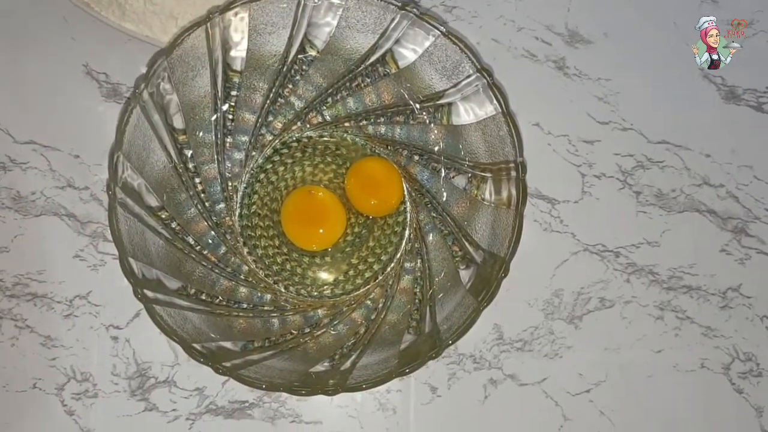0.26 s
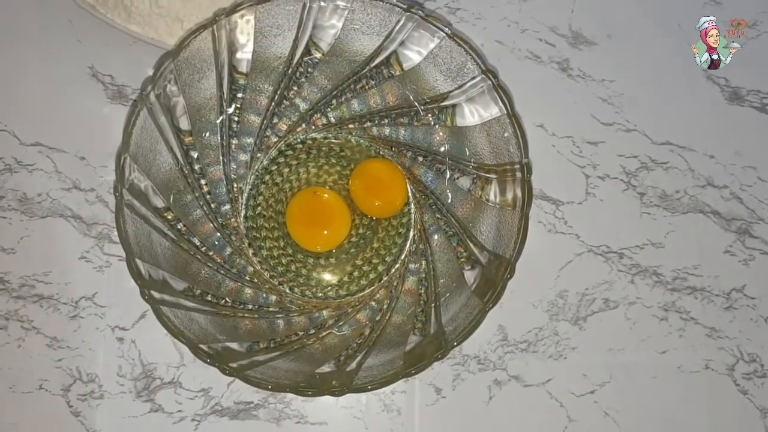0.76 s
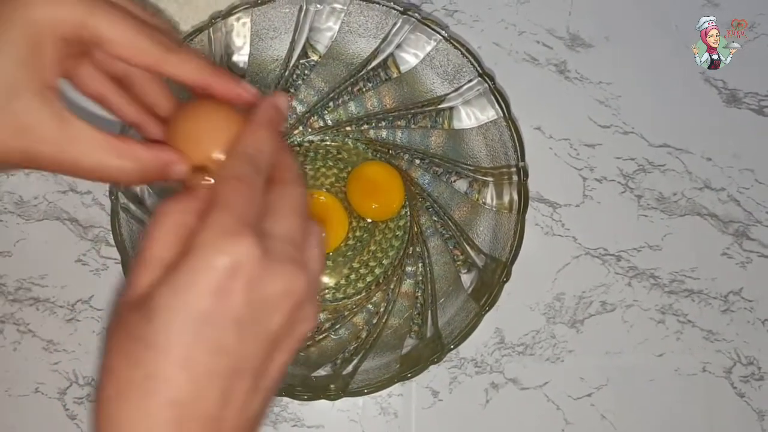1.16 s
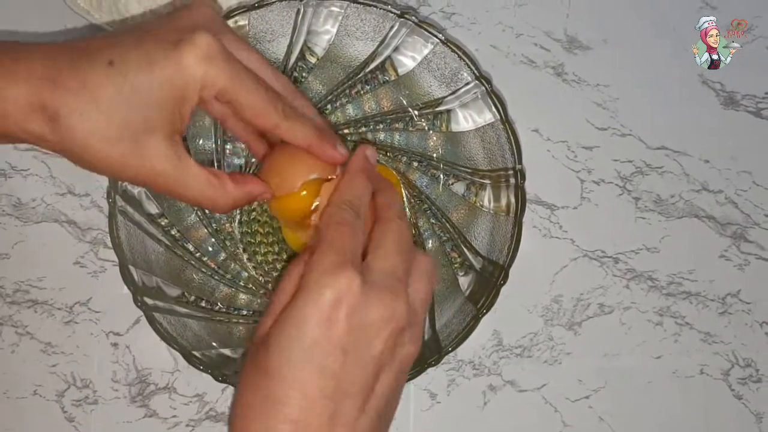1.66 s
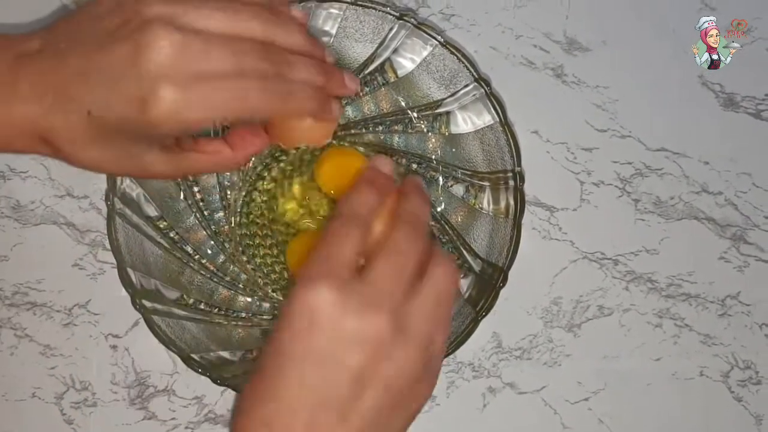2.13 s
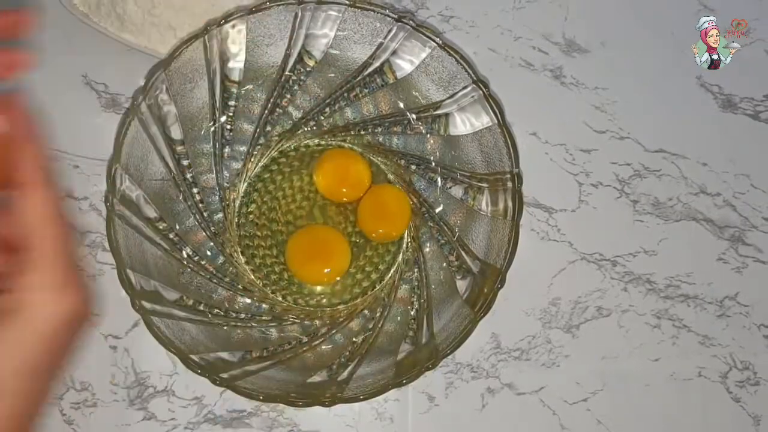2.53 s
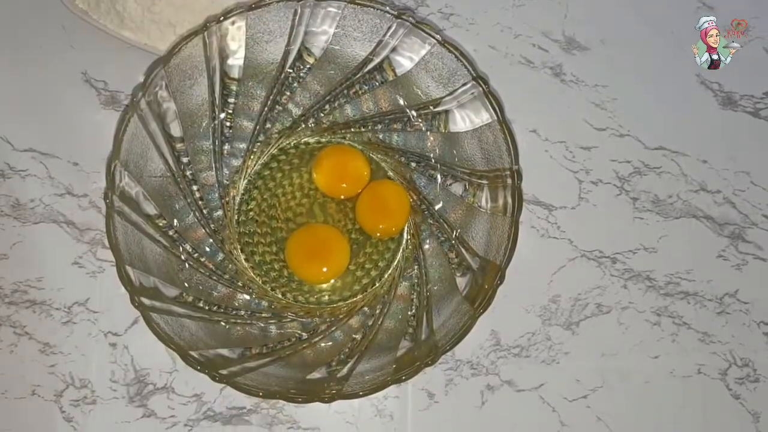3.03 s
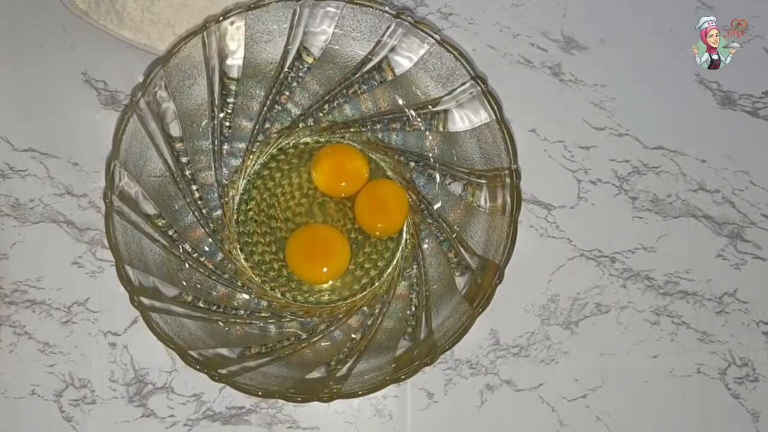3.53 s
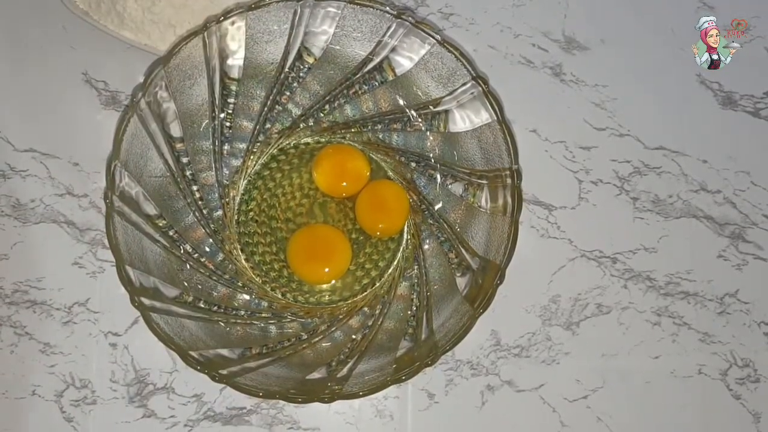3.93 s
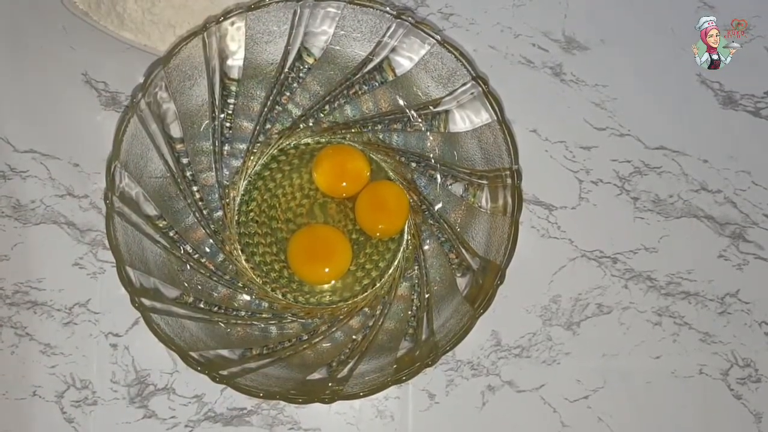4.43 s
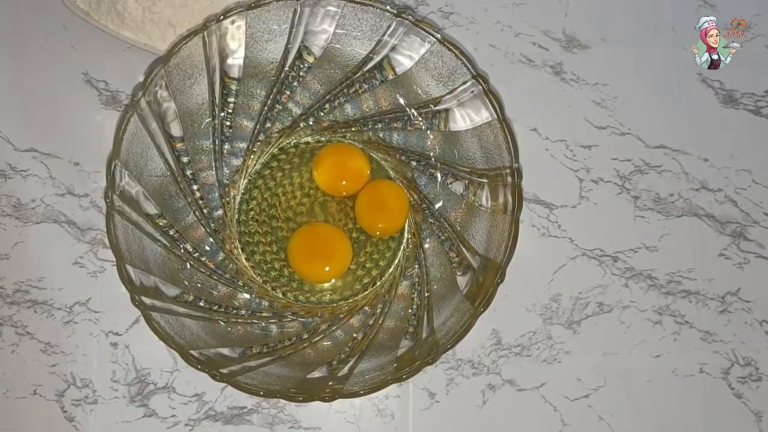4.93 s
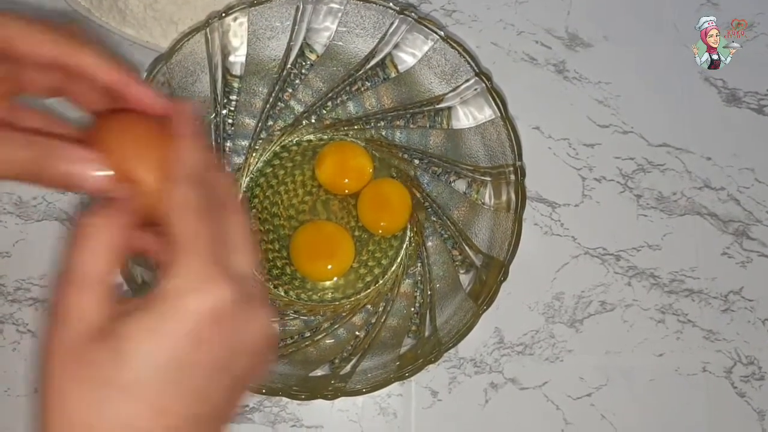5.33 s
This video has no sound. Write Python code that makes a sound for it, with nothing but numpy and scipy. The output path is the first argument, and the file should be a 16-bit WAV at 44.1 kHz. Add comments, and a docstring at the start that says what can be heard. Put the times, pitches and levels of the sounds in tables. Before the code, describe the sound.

Close stereo microphones hear a rapid cluster of hollow egg cracks, sparse peeling crackles and sharp shell ticks, then dense crunching as the halves are nested. Next come dry tray rubbing, faint rising creaks, soft low bumps and three spaced taps on the counter. Short bright kitchen reflections follow every sound; afterwards only quiet air and a faint hand rustle remain.

```python
"""An egg is knocked and crushed on a counter edge, pulled open over a glass bowl, its halves nested.
A second egg is scraped out of its creaking, crinkling tray and tapped three times on the counter.
Shell breaks in bursts of tiny clicks; short resonances are the air in the hollow egg and its halves.
Filtered grains make the rubbing, pulses make low room booms, and noise makes the rustle and the quiet.
A small hard kitchen answers every shell and tray sound."""
import sys
import numpy as np
from scipy import signal
from scipy.fft import rfft, irfft
from scipy.io import wavfile
from scipy.ndimage import uniform_filter1d

SR = 44100
rng = np.random.default_rng(int(sys.argv[2]) if len(sys.argv) > 2 else 0)


def dump_mix(stems):
    """Bounce the given channels to the path in sys.argv[1] as a 16-bit WAV at rate SR."""
    frames = np.atleast_2d(stems).T  # one column per channel
    limited = np.clip(frames, -1, 1)  # hard clip at full scale
    pcm = np.round(limited * 32767).astype(np.int16)
    wavfile.write(sys.argv[1], SR, pcm)


N = 246078
TIME = np.arange(N) / SR  # s

# All table levels are relative; each layer gets its trim in the mix.

# Blows of a whole egg: t/s, thud level/dB, ring f/Hz, ring level/dB, shell crack level/dB
KNOCKS = [(0.39, -61, 1880, -39, -34.5), (.402, -45.5, 1850, -10.5, -21),
          (0.508, -28.5, 1260, -12.5, -17.5), (0.529, -31, 1690, -24, -27.5),
          (.566, -16.5, 1410, -20.5, -27.5), (0.7536, -43.5, 2560, -35.5, -43.5),
          (3.2134, -27, 1055, -22, -33.5), (4.041, -63, 1940, -31, -35), (4.146, -30.5, 2210, -33, -35),
          (4.24, -48.5, 2460, -32.5, -34), (4.3024, -11, 1150, -11, -13.5),
          (4.4688, -14.5, 1180, -31, -18.5), (4.6099, -21.5, 1845, -21, -17)]
# Colour of the thud: f/Hz, level/dB
THUD_COLOUR = [(40, -20), (120, -10), (210, 0), (420, -4.5), (650, -0.5), (1000, -2.5), (1500, 2.5),
               (2400, 6), (3400, -4.5), (4400, -8.5), (9000, -34.5)]
# Colour of the cracking shell: f/Hz, level/dB
CRACK_COLOUR = [(800, -10.5), (2500, -5.5), (4200, -4.5), (6000, 0.5), (8500, -6), (12000, -6.5),
                (15500, -8.5)]


def knocks(kitchen):
    """The egg meets something hard: a thud, a short hollow ring and the shell giving way."""
    out = np.zeros((2, N))
    for s, thud_db, hz, ring_db, crack_db in KNOCKS:
        thud = flurry(push(length_s=0.00064, crumble=4.2), THUD_COLOUR)
        tone = hollow(hz, width_share=0.17)
        crack = flurry(fracture(length_s=0.0016), CRACK_COLOUR)
        front, all_round = radiate(undb(thud_db) * thud, undb(ring_db) * tone, undb(crack_db) * crack)
        add(out, s, place(front, kitchen, room_db=-2.0, all_round=all_round, near_db=-1.5))
    return out


# Short ringing after each thud: f/Hz, t60/s, level/dB
THUD_RINGING = [(1110, .2, -11), (1168, 0.31, -16.5), (1240, .22, -11), (1223, .27, -10)]


def thud_ringing(kitchen):
    """Each thud starts a few decaying sines near 1.2 kHz."""
    thuds = np.zeros(N)
    for s, thud_db, *_ in KNOCKS:
        thuds[int(s * SR)] = undb(thud_db)
    t = TIME[:SR // 2]
    sines = 0
    for hz, t60, db in THUD_RINGING:
        decay = np.exp(-np.log(1000) * t / t60)
        sines = sines + undb(db) * unit(np.sin(2 * np.pi * hz * t) * decay)
    ringing = signal.oaconvolve(thuds, sines)[:N]
    return place(ringing, kitchen, room_db=-6.5, near_db=-6.5)


# Clearest snaps of handled shell: t/s, snap level/dB, cavity f/Hz, cavity level/dB
SNAPS = [(.683, -36, 2000, -38), (1.0565, -31, 880, -44), (1.144, -31.5, 877, -63),
         (1.3025, -37.5, 790, -52), (1.4391, -30, 2470, -63.5), (1.4843, -6.5, 3580, -43.5),
         (1.498, -11.5, 1330, -34.5), (1.5096, -7, 3370, -17.5), (1.597, -26.5, 2300, -34),
         (1.6736, -30, 2640, -45.5), (1.722, -11, 3400, -23.5), (1.731, -41, 2320, -32),
         (1.785, -33, 3120, -33), (1.814, -31, 2200, -59), (1.8398, -37, 720, -56),
         (1.9165, -33, 3540, -38.5), (2.023, -28.5, 710, -56), (2.1166, -29, 2130, -38),
         (2.137, -37.5, 2060, -61), (2.3029, -34.5, 2080, -64), (2.3613, -10.5, 2025, -20.5),
         (2.428, -16, 1740, -21), (2.443, -12, 2050, -50), (2.4615, -16, 1990, -46),
         (2.6194, -26.5, 1870, -47), (2.632, -23, 1800, -32.5), (2.7041, -20.5, 1590, -14),
         (2.7315, -18.5, 1690, -16), (2.7514, -15.5, 1690, -15.5), (2.76, -30, 1580, -25.5),
         (3.3667, -29, 1670, -19.5), (3.421, -40, 1750, -15.5), (3.66, -24, 1820, -34),
         (3.871, -32, 1750, -33.5), (3.9489, -30.5, 2420, -36), (5.423, -58.5, 1800, -49),
         (5.518, -41.5, 1730, -60)]
# Colour of a snap: f/Hz, level/dB
SNAP_COLOUR = [(100, -30), (600, -21.5), (1000, -26), (2200, -28.5), (3400, -17), (4500, 0), (6200, 4),
               (8000, 2.5), (10500, 5), (13000, 0), (15500, -4)]


def snaps(kitchen):
    """Bright snaps of shell ring the air in the open half."""
    out = np.zeros((2, N))
    for s, snap_db, hz, cavity_db in SNAPS:
        snap = flurry(fracture(length_s=0.00024), SNAP_COLOUR)
        cavity = hollow(hz, width_share=0.17)
        front, all_round = radiate(undb(snap_db) * snap, undb(cavity_db) * cavity)
        add(out, s, place(front, kitchen, room_db=-3.5, all_round=all_round, near_db=7.0))
    return out


# Presses into the counter edge: t/s, hold/s, body level/dB, grit level/dB
CRUSH = [(.378, 0.079, -44.5, -39.5), (.482, .017, -37, -39), (.505, 0.03, -19.5, -30),
         (.549, 0.014, -21, -25.5)]
# Colour of the crush: f/Hz, level/dB
CRUSH_COLOUR = [(100, -44.5), (200, -18.5), (450, -11.5), (800, 0), (1300, 2.5), (1750, 8.5), (2400, -7.5),
                (3200, -9), (4200, -21), (5800, -17.5), (11000, -25), (15500, -36.5)]
CRUSH_SHAPE = (0.0088, .02)  # attack/s, release/s


def crush(kitchen):
    """The egg is pressed into the counter edge and its shell breaks in a stream of grains."""
    grains = crunch(CRUSH, CRUSH_SHAPE, CRUSH_COLOUR, rate=2500, spread_db=3.0, patchy_db=3.0)
    return place(grains, kitchen, room_db=-2.0)


# Thumbs pulling the shell apart: t/s, hold/s, body level/dB, grit level/dB
PEEL = [(1.016, 0.092, -52.5, -47.5), (1.44, .02, -71, -45), (1.476, 0.018, -40, -25.5),
        (1.58, 0.029, -66, -37), (1.668, 0.023, -77, -35), (1.72, 0.15, -59, -51),
        (1.872, 0.028, -55, -44.5), (2.018, 0.011, -54, -42), (2.084, .035, -63, -51.5),
        (2.18, 0.027, -60, -61.5), (5.41, 0.16, -66, -67)]
# Colour of the peel: f/Hz, level/dB
PEEL_COLOUR = [(250, -29), (480, -27.5), (780, 4.5), (1100, -22), (1600, 1.5), (2250, 1), (2700, -2),
               (3400, 1), (4600, -3.5), (10400, -3.5), (15500, -11.5)]
PEEL_SHAPE = (0.0086, 0.038)  # attack/s, release/s


def peel(kitchen):
    """Thumbs work at the shell: a sparser stream of grains, uneven in colour."""
    grains = crunch(PEEL, PEEL_SHAPE, PEEL_COLOUR, rate=1300, spread_db=4.5, patchy_db=6.5)
    return place(grains, kitchen, room_db=-0.5)


# One half shell pushed into the other: t/s, hold/s, body level/dB, grit level/dB
NEST = [(2.36, 0.0088, -33, -47), (2.38, .025, -30.5, -25), (2.408, 0.025, -24, -21.5),
        (2.465, 0.061, -44, -40.5), (2.63, .06, -46.5, -41), (2.695, 0.051, -30, -26)]
# Colour of the nesting: f/Hz, level/dB
NEST_COLOUR = [(180, -62.5), (300, -20.5), (492, -20), (590, -11), (696, -9), (877, -5), (1160, -12),
               (1330, 3.5), (1440, -6), (1810, 5), (3400, -13.5), (3750, -6.5), (5660, -9), (10600, -13.5),
               (15500, -14.5)]
NEST_SHAPE = (0.0081, 0.061)  # attack/s, release/s


def nest(kitchen):
    """Shell slides and breaks against shell: a dense stream of grains of very mixed size."""
    grains = crunch(NEST, NEST_SHAPE, NEST_COLOUR, rate=3300, spread_db=5.5, patchy_db=5.0)
    return place(grains, kitchen, room_db=-5)


# Resonances of the tray: f/Hz, width/Hz, level/dB
TRAY = [(830, 57, -15.5), (1360, 350, -7.5), (1830, 890, -3.5), (2500, 180, 3), (4630, 1100, -2.5)]
# The egg rubbing on its tray: t/s, hold/s, body level/dB, grit level/dB
SCRAPE = [(3.02, 0.14, -73.5, -60.5), (3.205, 0.026, -31.5, -39.5), (3.24, 0.16, -41, -32),
          (3.355, 0.044, -29, -26.5), (3.41, 0.064, -33.5, -46), (3.495, 0.042, -34, -36),
          (3.595, .015, -39, -38.5), (3.65, 0.03, -41, -40), (3.73, 0.17, -64, -50),
          (3.835, 0.026, -44, -41.5), (3.9, 0.049, -49, -51), (4.025, 0.005, -41.5, -49),
          (4.138, 0.0052, -34.5, -42.5), (4.18, 0.11, -54.5, -56)]
SCRAPE_SHAPE = (0.012, 0.075)  # attack/s, release/s


def crinkles():
    """The flexing tray pops in each of its resonances, louder the harder it is rubbed."""
    pops = 0
    for hz, width, db in TRAY:
        pop = ring_twice(clicks(rate=45, spread_db=3, size=N), hz, width)
        pops = pops + undb(db) * steady(pop)
    body_gain = gains(SCRAPE, SCRAPE_SHAPE)[0]
    return body_gain * steady(pops)


# Colour of the rubbing: f/Hz, level/dB
SCRAPE_COLOUR = [(150, -35), (400, -25), (700, -12), (1200, -10), (1800, -2), (2700, -6), (4100, -12),
                 (5000, -6), (8000, -6.5), (11400, -6.5), (15500, -15.5)]


def scrape(kitchen):
    """The egg rubs on its tray in a dense stream of slips, with the tray crinkling along."""
    rubbing = crunch(SCRAPE, SCRAPE_SHAPE, SCRAPE_COLOUR, rate=3500, spread_db=3.0, patchy_db=2.5)
    return place(rubbing + undb(-2) * crinkles(), kitchen, room_db=-3.0)


# Creaks as the egg is pulled free: t/s, hold/s, level/dB
CREAK = [(3.55, 0.012, -53), (3.72, .015, -50.5), (3.83, 0.012, -51.5), (3.91, 0.014, -61)]
CREAK_SHAPE = (0.035, 0.022)  # attack/s, release/s


def creak(kitchen, start_hz=393, rise_hz_per_s=230):
    """One rough, broken friction tone whose mean pitch rises as the pull tightens."""
    first_s = CREAK[0][0]
    hz = start_hz + rise_hz_per_s * np.maximum(TIME - first_s, 0)
    pitch = hz * (1 + 0.09 * wander(200))
    grip = undb(4 * wander(70) - 3)
    tone = np.sin(2 * np.pi * np.cumsum(pitch) / SR)
    return place(gains(CREAK, CREAK_SHAPE)[0] * grip * tone, kitchen, room_db=1)


# Low booms of the room: t/s, hold/s, boom level/dB, level of the resonances above it/dB
BOOMS = [(.04, 0.14, -52.5, -80), (2.33, 0.17, -56, -66.5), (2.68, 0.082, -62, -58),
         (3.505, 0.073, -46.5, -42.5), (3.61, 0.043, -51.5, -55.5), (3.83, 0.022, -61, -64),
         (4.155, 0.059, -39, -37.5), (4.268, 0.0022, -33, -47.5), (4.42, .24, -63, -59)]
# Low resonances above the boom: f/Hz, width/Hz, level/dB
LOW_RESONANCES = [(127.5, 12, 1.5), (143, 23, 0), (235, 40, -17)]
BOOM_SHAPE = (0.028, 0.082)  # attack/s, release/s


def boom(boom_hz=63, unevenness=0.19, scatter_db=1.5):
    """Uneven pulses at about 63 Hz stir the low resonances of the room."""
    chance = rng.standard_normal((400, 2))  # for the spacing and the size of each pulse
    at = (np.cumsum(1 + unevenness * chance[:, 0]) * SR / boom_hz).astype(int)
    pulses = np.bincount(np.abs(at), undb(scatter_db * chance[:, 1]), N)[:N]
    low = ring(ring(pulses, boom_hz, 18.0), boom_hz, 30)
    upper = sum(undb(db) * steady(ring_twice(pulses, hz, width)) for hz, width, db in LOW_RESONANCES)
    low_gain, upper_gain = gains(BOOMS, BOOM_SHAPE)
    return low_gain * steady(low) + upper_gain * steady(upper)


def room_boom():
    """A shared boom leaning left, plus a weaker one in opposite polarity for width."""
    lean = undb(np.array([[2.2], [-2.2]]))
    opposite = np.array([[1], [-1]])
    return lean * boom() + undb(-14.5) * opposite * boom()


# Movements of arms and hands: t/s, hold/s, level/dB
RUSTLE = [(0, .3, -80), (.9, 0.43, -60.5), (2.1, 1, -70.5), (3.08, 0.7, -59.5), (3.46, .02, -55),
          (5.2, .25, -64.5)]
# Colour of the rustle: f/Hz, level/dB
RUSTLE_COLOUR = [(60, -4.5), (150, -10.5), (250, 0), (350, 6), (490, 0.5), (650, -5.5), (1200, -13.5),
                 (4000, -42)]
RUSTLE_SHAPE = (.16, 0.083)  # attack/s, release/s


def rustle():
    """Moving arms and hands rustle softly: swells of coloured noise."""
    return gains(RUSTLE, RUSTLE_SHAPE)[0] * air(RUSTLE_COLOUR, side=0.5)


# Level of the quiet room: t/s, level/dB
QUIET_LEVEL = [(0, -66), (.7, -60), (1.2, -57.5), (2.2, -65.5), (4.6, -59.5), (4.9, -69), (5.3, -64.5),
               (5.58, -62.5)]
# Colour of the quiet room: f/Hz, level/dB
QUIET_COLOUR = [(15, -25.5), (25, -1.5), (75, 1.5), (253, -13), (349, -16), (631, -19.5), (1530, -22.5),
                (2630, -24), (5730, -27.5), (8130, -25), (11200, -23.5), (15500, -28)]


def quiet():
    """The quiet room is coloured stereo noise of slowly changing level."""
    level_db = np.interp(TIME, *np.transpose(QUIET_LEVEL))
    return undb(level_db) * air(QUIET_COLOUR, side=0.4)


# Decay time of the kitchen: f/Hz, t60/s
KITCHEN_T60 = [(100, 0.23), (300, .28), (800, 0.3), (1800, 0.25), (5000, 0.22), (13000, 0.19)]


def reflections(shared_hz=260, count=8, size=14400):
    """Dense stereo tails of the tiled kitchen for a few hand positions; lows are alike in both channels."""
    t = np.arange(size) / SR
    f = np.maximum(np.fft.rfftfreq(size, 1 / SR), 1)
    hz, t60 = np.transpose(KITCHEN_T60)
    common = rfft(rng.standard_normal((count, 1, size)))
    own = rfft(rng.standard_normal((count, 2, size)))
    alike = 1 / (1 + (f / shared_hz) ** 2)
    spectra = np.sqrt(alike) * common + np.sqrt(1 - alike) * own
    tails = 0
    for band, decay_s in zip(np.eye(len(hz)), t60):
        weight = np.interp(np.log(f), np.log(hz), band)  # overlapping bands
        tails = tails + irfft(spectra * weight) * np.exp(-np.log(1000) * t / decay_s)
    return tails


def place(x, kitchen, room_db, all_round=None, near_db=-2, left_db=3,
          near_s=0.00096, build_s=0.00047, lag_samples=15, size=512):
    """Sound at two microphones: direct path (left first), quick bounces off bowl and counter, then room.
    all_round is what the source sends to the walls, if that is not x itself."""
    tails = kitchen[rng.integers(len(kitchen))]
    t = np.arange(tails.shape[1]) / SR
    quick = t * np.exp(-t / near_s)
    build = 1 - np.exp(-t / build_s)
    to_walls = x if all_round is None else all_round
    heard = []
    for tail, lag, side_db in zip(tails, (0, lag_samples), (left_db / 2, -left_db / 2)):
        bounces = unit(tail * quick)[:size]
        path = unit(signal.unit_impulse(size, lag) + undb(near_db) * bounces)
        direct = np.pad(signal.oaconvolve(x, path), (0, len(t) - size))
        room = signal.oaconvolve(to_walls, unit(tail * build))
        heard.append(undb(side_db) * (direct + undb(room_db) * room)[:N])
    return np.array(heard)


def crunch(rows, shape, points, rate, spread_db, patchy_db, split_hz=3200):
    """A stream of slips and breaks, split into dull body and bright grit; its colour drifts at random."""
    grains = colour(clicks(rate, spread_db, N), points)
    for hz in np.geomspace(1100, 9000, 5):
        drift = undb(patchy_db * np.clip(wander(45), -2, 1))
        grains = grains + (drift - 1) * ring(grains, hz, hz / 2)
    low = signal.butter(3, split_hz, "low", fs=SR, output="sos")
    high = signal.butter(3, split_hz, "high", fs=SR, output="sos")
    body = steady(signal.sosfilt(low, grains))
    grit = steady(signal.sosfilt(high, grains))
    body_gain, grit_gain = gains(rows, shape)
    return body_gain * body + grit_gain * grit


def fracture(length_s, size=1024):
    """A crack starts, runs through the shell and dies: a flurry of micro-clicks."""
    t = np.arange(size) / SR / length_s
    return clicks(26000, 0.5, size) * (1 - np.exp(-t / 0.14)) * np.exp(-t)


def push(length_s, crumble, size=1024):
    """One firm contact impulse with crumbling after it."""
    return signal.unit_impulse(size) + crumble * unit(fracture(length_s))


def hollow(hz, width_share, size=1024):
    """Air in the shell, struck once: a short, broad ring, the same in every direction."""
    tone = unit(ring_twice(signal.unit_impulse(size), hz, hz * width_share))
    return np.array([tone, tone])


def flurry(micro_clicks, points):
    """Coloured micro-clicks, and the bare colour left when they are averaged over all directions."""
    bare = signal.unit_impulse(len(micro_clicks))
    return np.array([unit(colour(x, points, size=1024)) for x in (micro_clicks, bare)])


def radiate(*parts):
    """Parts of one blow add as waves towards the microphone and as powers towards the walls."""
    front, averaged = np.swapaxes(parts, 0, 1)
    size = front.shape[1]
    power = np.sum(np.abs(rfft(averaged)) ** 2, axis=0)
    f = np.maximum(np.fft.rfftfreq(size, 1 / SR), 1)
    points = np.transpose([f, 10 * np.log10(power + 1e-18)])
    return front.sum(axis=0), colour(signal.unit_impulse(size), points, size=size)


def clicks(rate, spread_db, size):
    """Random clicks, rate per second on average, mostly small and a few large."""
    sizes = undb(spread_db * np.minimum(rng.exponential(size=size), 4))
    return (rng.random(size) < rate / SR) * sizes * rng.choice([-1, 1], size)


def air(points, side):
    """Soft coloured noise, partly shared by both channels, with less side signal in the lows."""
    mid, apart = (steady(colour(rng.standard_normal(N), points)) for _ in range(2))
    low = signal.butter(1, 500, fs=SR, output="sos")
    apart = apart - side * signal.sosfilt(low, apart)
    return np.array([mid + apart, mid - apart])


def wander(rate):
    """A smoothed random curve of spread one, with rate new values per second."""
    knots = rng.standard_normal(2048)
    path = np.interp(TIME * rate, np.arange(len(knots)), knots)
    return steady(uniform_filter1d(path, int(SR / rate)))


def gains(rows, shape):
    """One gain curve for each dB column: every stroke swells, holds and fades."""
    attack_s, release_s = shape
    power = 0
    for s, hold_s, *db in rows:
        corners = s + np.cumsum([0, attack_s, hold_s, release_s])
        envelope = np.interp(TIME, corners, [0, 1, 1, 0]) ** 2
        power = power + np.outer(undb(db), envelope) ** 2
    return np.sqrt(power)


def colour(x, points, size=4096):
    """Causal minimum-phase filter through (f/Hz, level/dB) points."""
    hz, db = np.transpose(points)
    f = np.maximum(np.fft.rfftfreq(size, 1 / SR), 1)
    cepstrum = irfft(np.log(undb(np.interp(np.log(f), np.log(hz), db))))
    cepstrum[1:size // 2] *= 2  # fold the cepstrum onto positive time
    cepstrum[size // 2 + 1:] = 0
    return signal.fftconvolve(x, irfft(np.exp(rfft(cepstrum))))[:len(x)]


def ring(x, hz, width):
    """One resonance, width in Hz."""
    return signal.lfilter(*signal.iirpeak(hz, hz / width, fs=SR), x)


def ring_twice(x, hz, width):
    """A resonance followed by one twice as wide, for steeper skirts."""
    return ring(ring(x, hz, width), hz, 2 * width)


def add(track, s, sound):
    """Mix a stereo sound into a track at time s."""
    i = int(s * SR)
    track[:, i:i + sound.shape[1]] += sound[:, :N - i]


def undb(db):
    """Turn decibels into an amplitude factor."""
    return 10 ** (np.asarray(db) / 20)


def unit(x):
    """Scale to an energy of one."""
    return x / np.sqrt(np.sum(x ** 2) + 1e-18)


def steady(x):
    """Scale to a standard deviation of one."""
    return x / np.std(x)


def scene():
    """Mix shell work, tray, low booms, rustle and the quiet room."""
    kitchen = reflections()
    shell = undb(18.0) * knocks(kitchen) + undb(15.0) * thud_ringing(kitchen) + undb(14.5) * snaps(kitchen)
    shell = shell + crush(kitchen) + undb(-5.0) * peel(kitchen) + undb(-6.5) * nest(kitchen)
    tray = undb(-4.5) * scrape(kitchen) + creak(kitchen)
    return shell + tray + room_boom() + undb(-5.5) * rustle() + undb(-3.0) * quiet()


def record(dry):
    """Peaks beyond full scale clip, then a steep low-pass cuts the top."""
    top_cut = signal.ellip(10, 0.2, 70, 15550, fs=SR, output="sos")  # ripple dB, stop dB, edge Hz
    return signal.sosfilt(top_cut, np.clip(dry, -1, 1))


dry = scene()
out = record(dry)
dump_mix(out)
```